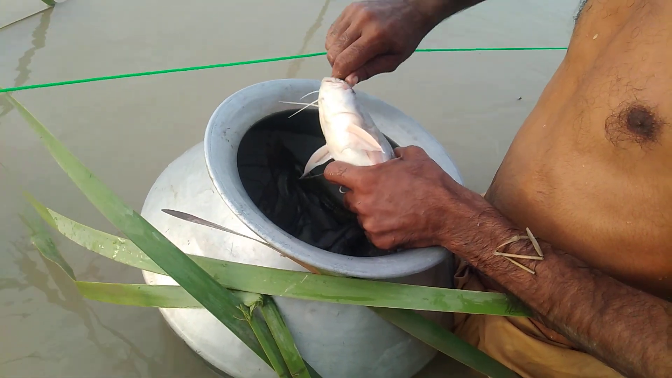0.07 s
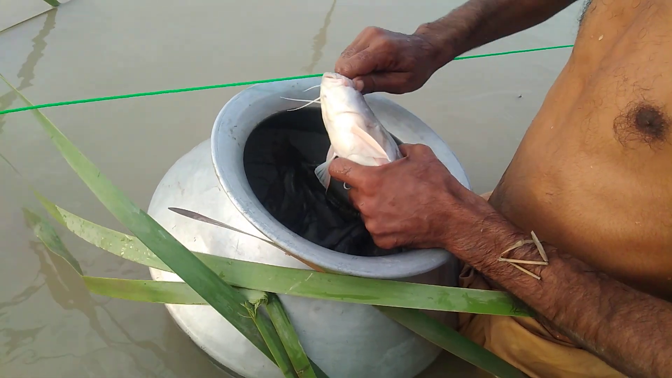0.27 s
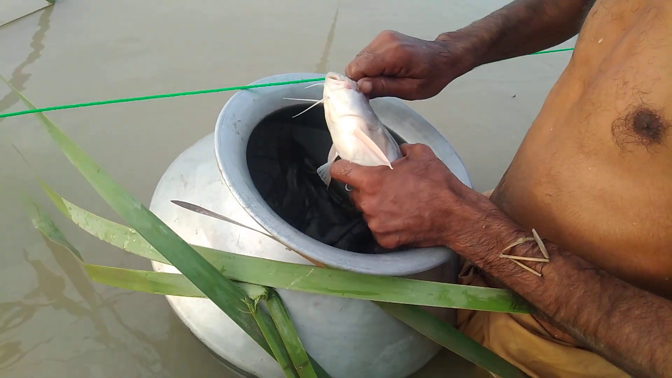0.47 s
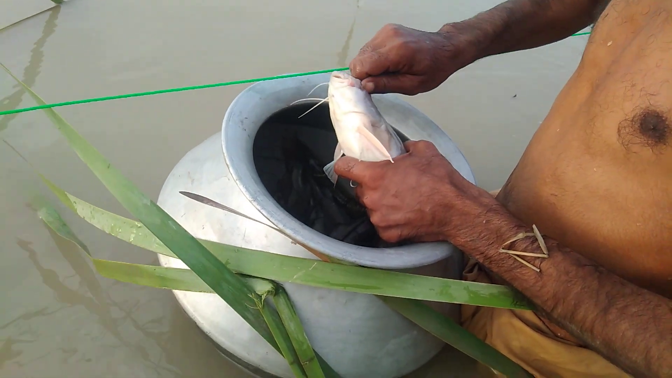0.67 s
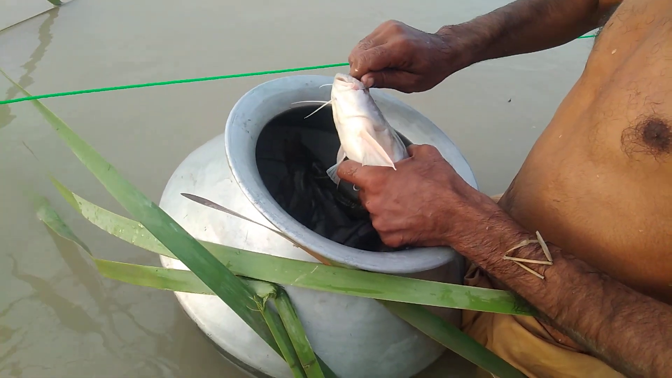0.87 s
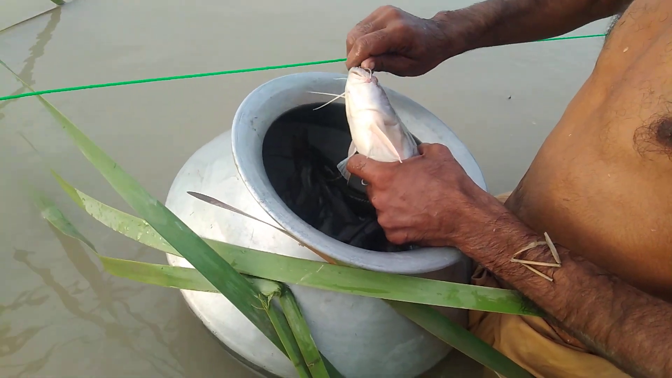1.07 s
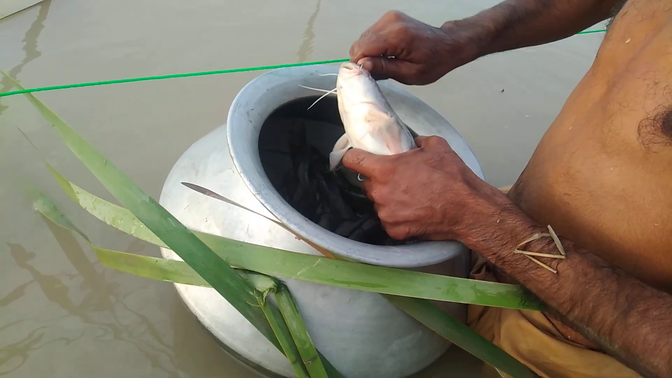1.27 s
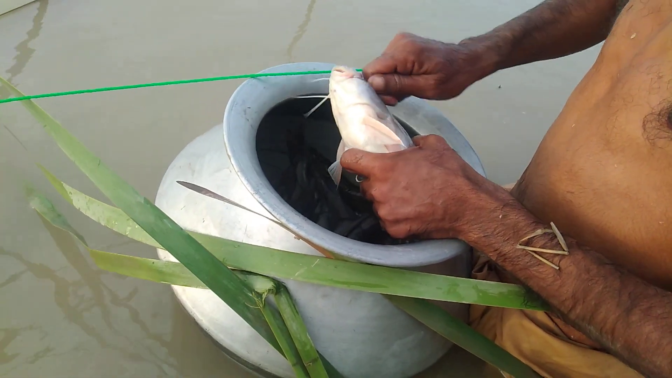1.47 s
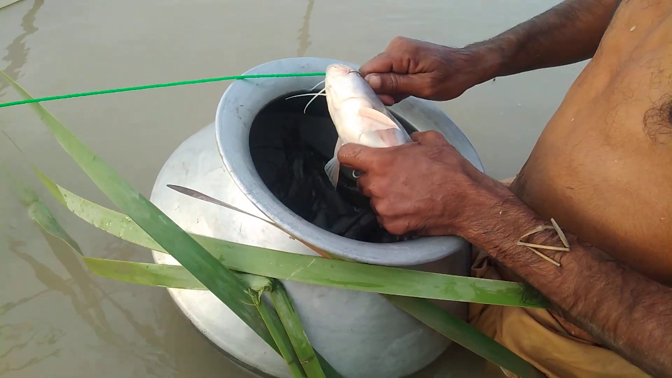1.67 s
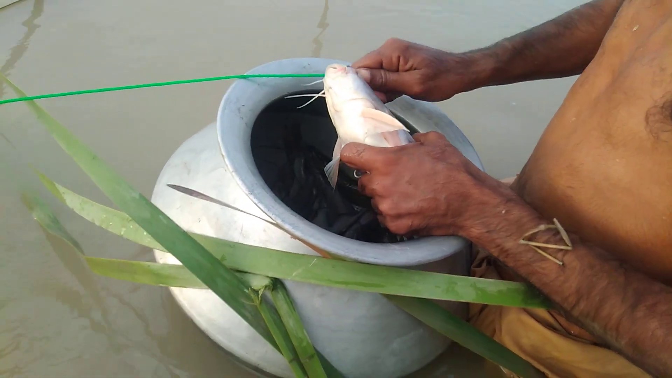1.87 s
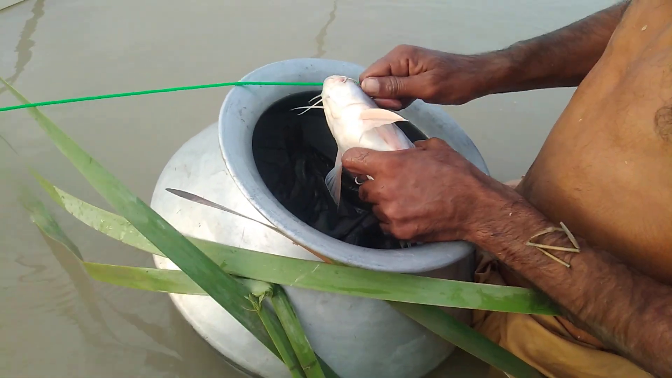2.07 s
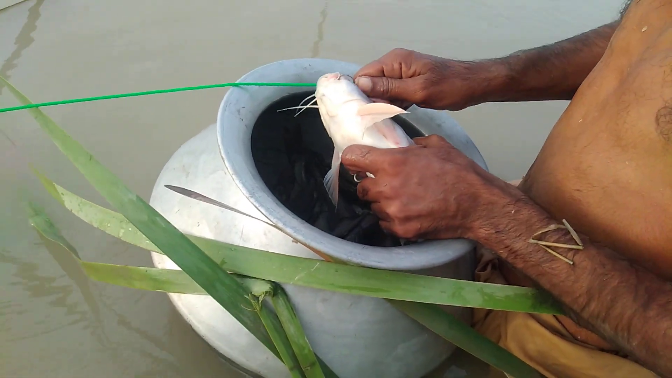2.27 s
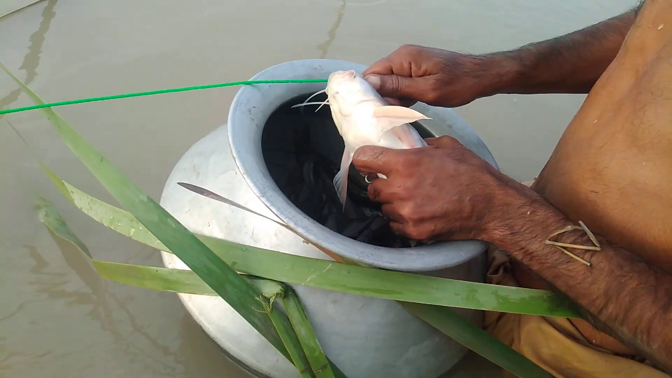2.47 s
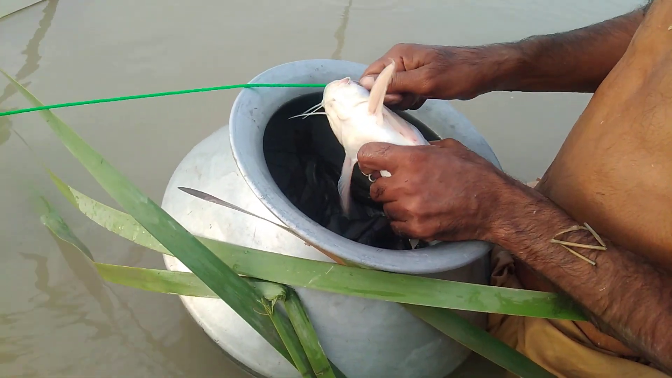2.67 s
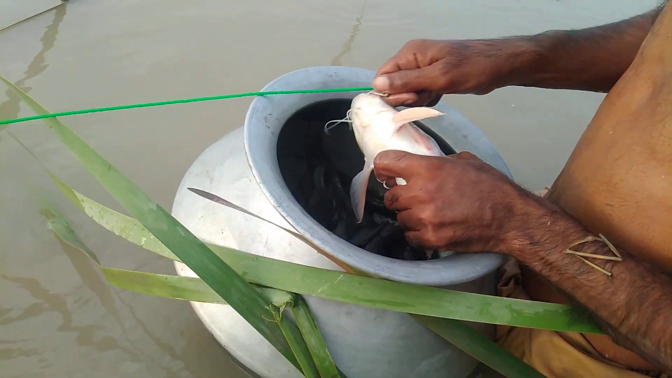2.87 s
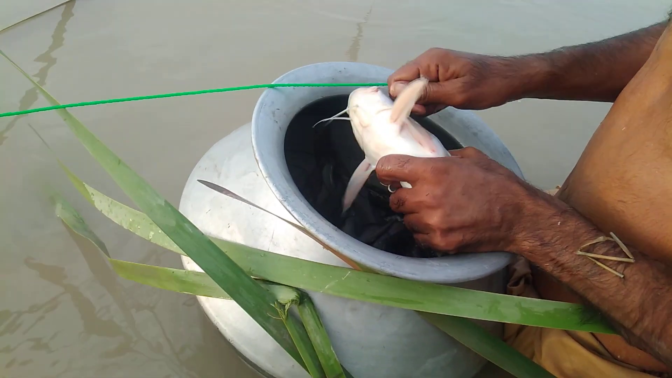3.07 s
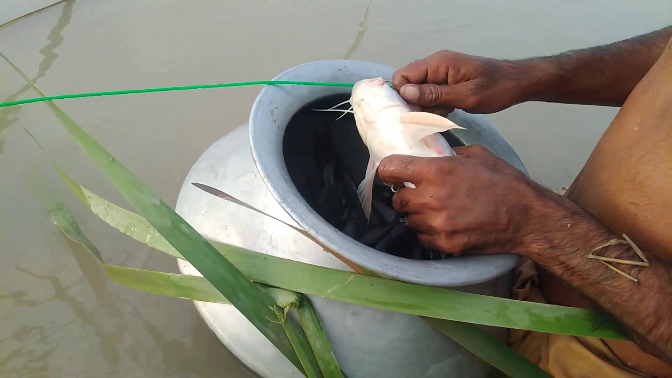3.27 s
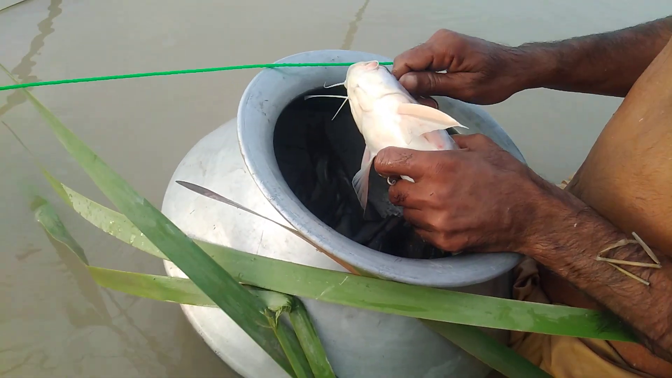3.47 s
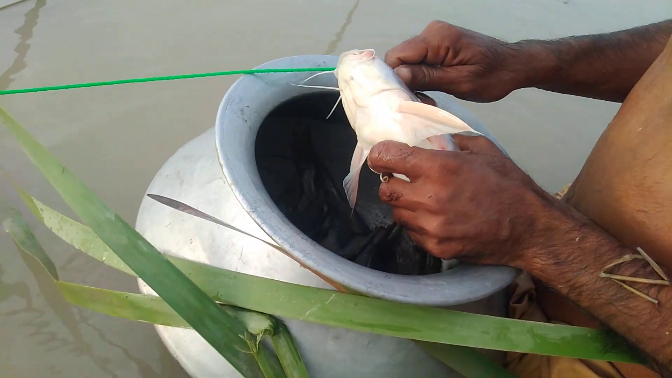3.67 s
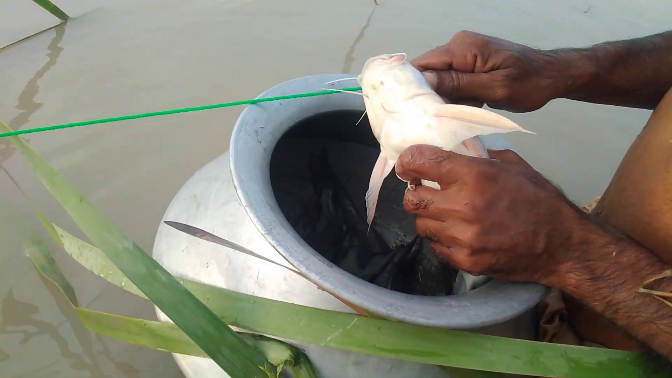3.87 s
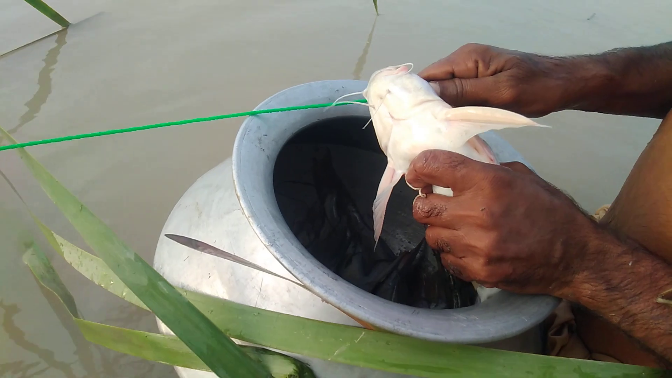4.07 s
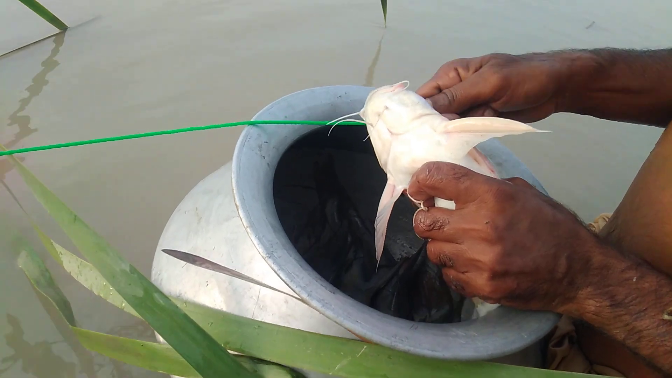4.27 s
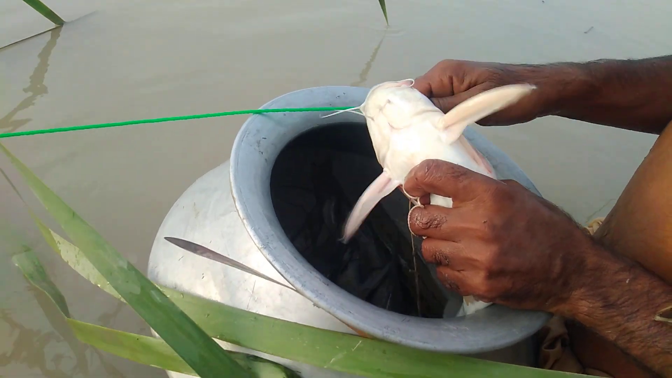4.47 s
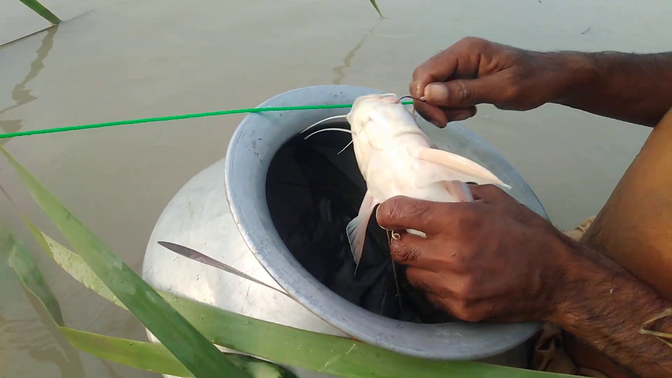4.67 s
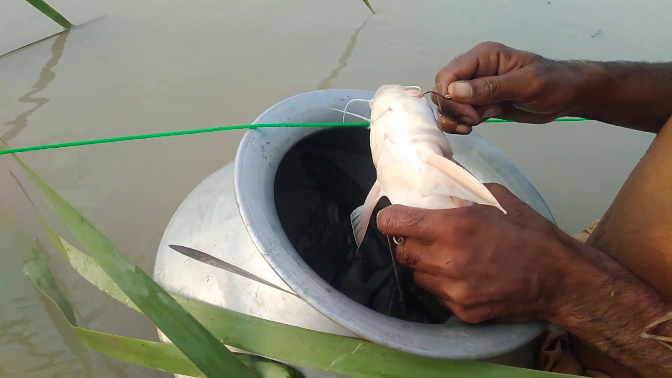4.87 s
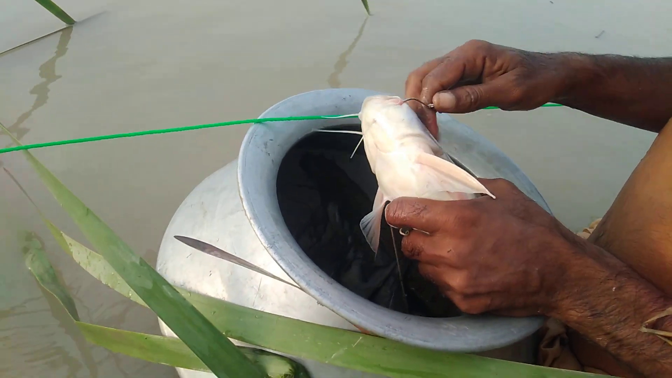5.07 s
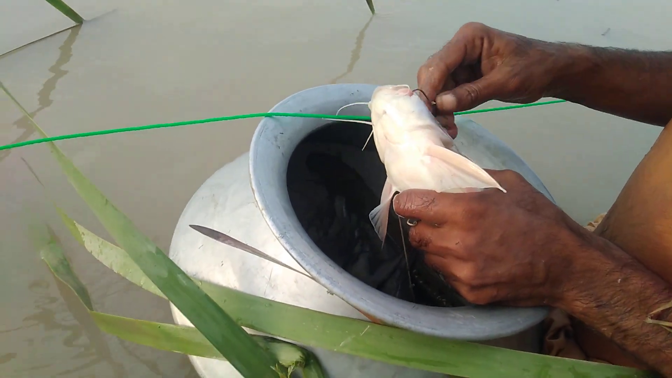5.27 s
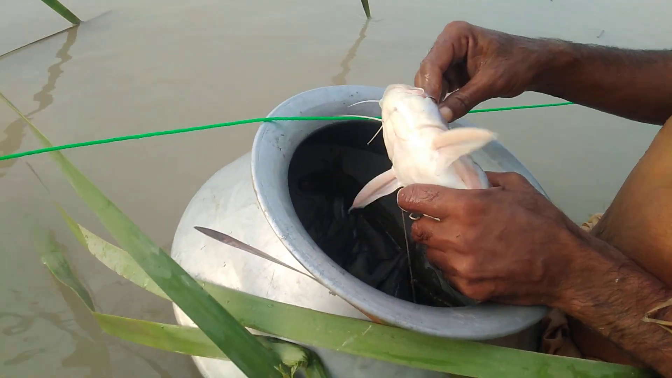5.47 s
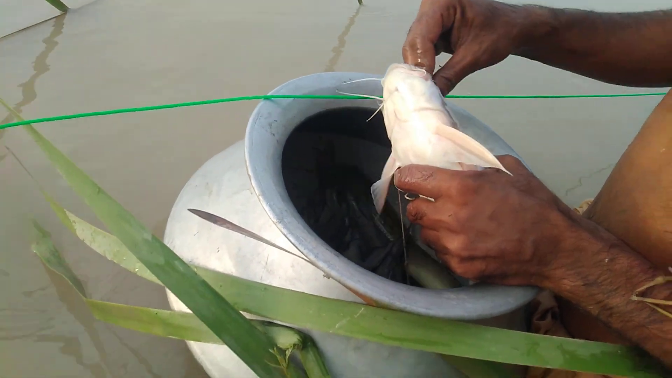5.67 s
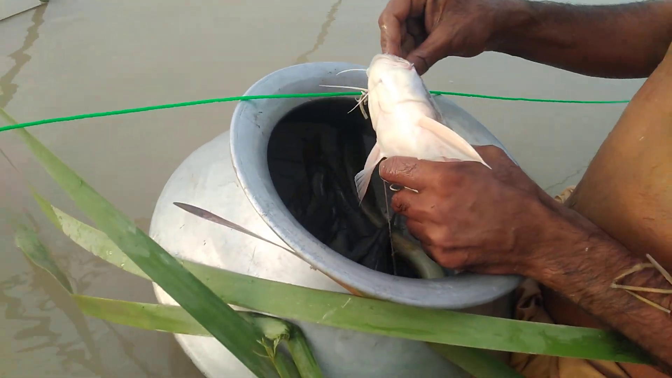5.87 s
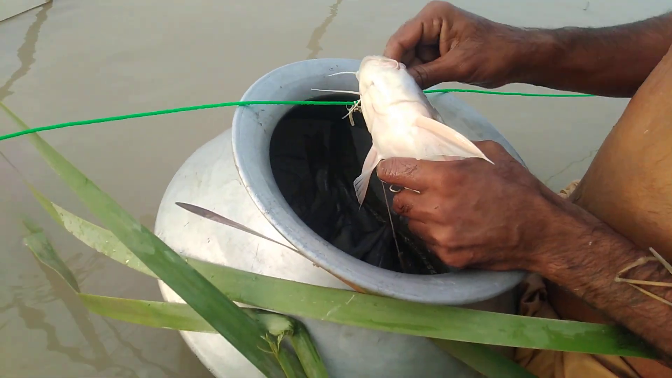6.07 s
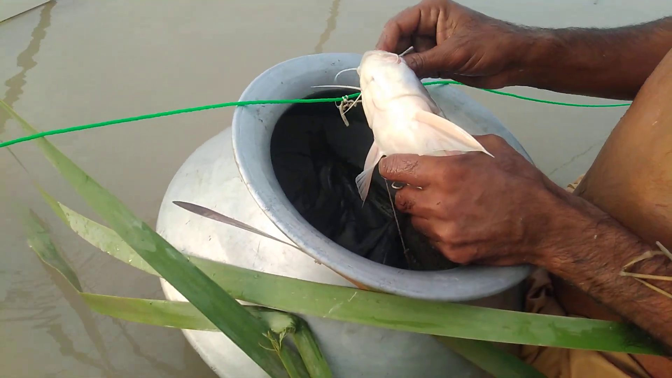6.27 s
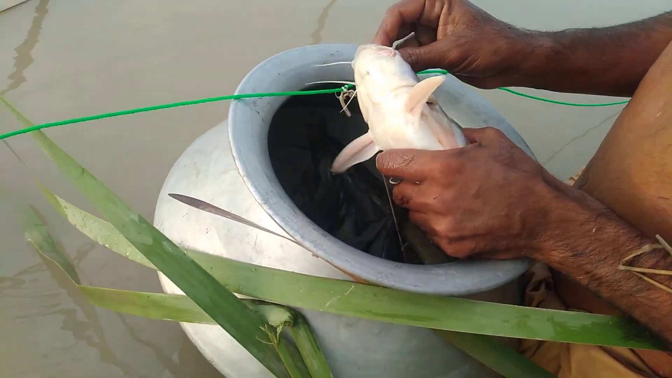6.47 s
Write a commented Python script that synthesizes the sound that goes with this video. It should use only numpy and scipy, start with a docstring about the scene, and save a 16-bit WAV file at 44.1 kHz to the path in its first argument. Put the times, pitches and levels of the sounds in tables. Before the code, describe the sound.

Light wind bumps the microphone over quiet shallow water. After a soft slippery rub and small ticks, a handled fish makes dry creaking croaks, grouped with pauses and ending in a single one. Sharp wet knocks sound the metal pot, tiny splashes stir its hollow interior, single drops plop, and a faint high insect trill comes and goes far away. Close, fairly dry outdoor sound.

```python
"""Shallow water, outdoors: a light breeze rumbles on the microphone while a catch stirs in an aluminium pot.
Close by, a wet hand slides over the fish and ticks on it; a far insect soon trills, and water drips.
Then the catfish, held over the pot, croaks by grinding its fin spines in their sockets: each stroke is a run
of ridge slips that speeds up and slows down, ringing the body and rasping in the treble.
Knocks ring the pot's metal between and after the first strokes."""
import sys
import numpy as np
from scipy import signal
from scipy.fft import rfft, irfft
from scipy.io import wavfile
from scipy.ndimage import uniform_filter1d

SR = 44100
rng = np.random.default_rng(int(sys.argv[2]) if len(sys.argv) > 2 else 0)


def unload_wav(signal):
    """Save mono or channel-first audio to the path in sys.argv[1] as 16-bit WAV at rate SR, clipped to [-1, 1]."""
    wavfile.write(
        sys.argv[1],
        SR,
        np.round(np.clip(np.atleast_2d(signal).T, -1, 1) * 32767).astype(np.int16),
    )


N = 286914
TIME = np.arange(N) / SR


def from_db(db):
    """Decibels to gain."""
    return 10 ** (np.asarray(db) / 20)


def rms_one(x):
    """Scale to unit power."""
    return x / np.sqrt(np.mean(x ** 2) + 1e-20)


def level_along(rows, t):
    """Level in dB at times t, joined by straight lines between the (time_s, level_db) rows."""
    time_s, level_db = np.transpose(rows)
    return np.interp(t, time_s, level_db)


def add(out, s, x):
    """Mix x in from second s."""
    at = max(0, round(s * SR))
    out[at:at + len(x)] += x[:max(0, N - at)]


def coloured(x, spectrum, size=2048):
    """Causal (minimum-phase) filter with the given spectrum and unit power gain."""
    hz, db = np.transpose(spectrum)
    grid = np.maximum(np.arange(size // 2 + 1) * SR / size, 1)
    grid_db = np.interp(np.log(grid), np.log(hz), db)
    cepstrum = irfft(np.log(from_db(grid_db)))
    # folding the cepstrum onto positive times makes the response minimum-phase
    cepstrum[1:size // 2] *= 2
    cepstrum[size // 2 + 1:] = 0
    response = irfft(np.exp(rfft(cepstrum)))
    return signal.fftconvolve(x, response / np.linalg.norm(response))[:len(x)]


def resonance(x, hz, width_hz):
    """Two-pole band-pass, gain 1 on top."""
    r = np.exp(-np.pi * width_hz / SR)
    poles = [1, -2 * r * np.cos(2 * np.pi * hz / SR), r * r]
    return signal.lfilter(np.array([1, 0, -1]) * (1 - r * r) / 2, poles, x + 1e-18)


def body(x, modes):
    """Parallel resonances of alternating sign."""
    return sum((-1) ** k * from_db(db) * resonance(x, hz, width) for k, (hz, width, db) in enumerate(modes))


def high_pass(x, hz):
    """Fourth-order low cut."""
    return signal.sosfilt(signal.butter(4, hz, "high", fs=SR, output="sos"), x)


def low_pass(x, hz):
    """Fourth-order high cut."""
    return signal.sosfilt(signal.butter(4, hz, fs=SR, output="sos"), x)


def dispersed(x, hz, width_hz):
    """All-pass: soft tissue delays one band and so smears each thump in time."""
    r = np.exp(-np.pi * width_hz / SR)
    poles = np.array([1, -2 * r * np.cos(2 * np.pi * hz / SR), r * r])
    return signal.lfilter(poles[::-1], poles, x)


def dying(t, t60):
    """Exponential decay, 60 dB down after t60 seconds."""
    return from_db(-60 * t / t60)


def evened(x, live, size=441):
    """Hold the short-term power at one for the live samples; what follows dies freely."""
    power = uniform_filter1d(x[:live] ** 2, size)
    return x / np.sqrt(np.pad(power, (0, len(x) - live), "edge") + 1e-12)


def wander(step_s):
    """A random value every step, joined by straight lines; the values spread about 1."""
    return np.interp(TIME / step_s, np.arange(4096), rng.standard_normal(4096))


# colour of the breeze's rumble on the microphone: pitch_hz, density_db [dB per Hz]
RUMBLE_COLOUR = [(8.8, -55), (15, 2), (43, 3), (113, -2.5), (183, -10.5), (261, -39), (400, -31),
                 (520, -56), (880, -120)]
# the breeze between gusts: time_s, level_db
BREEZE_LULL = [(0, -56), (1.7, -55.5), (2.3, -56), (2.9, -54), (3.9, -54), (4.6, -56), (5.4, -57.5),
               (5.8, -54.5), (6.5, -54.5)]
# gusts on the microphone: centre_s, half_length_s, level_db
WIND_GUSTS = [(.025, 0.039, -44.5), (0.348, 0.043, -47), (0.603, 0.022, -39.5), (0.681, .03, -37),
              (1.164, 0.052, -42.5), (1.657, 0.052, -49.5), (1.937, .06, -51.5), (2.814, 0.022, -50.5),
              (3.697, 0.078, -51.5), (4.132, 0.09, -47), (5.65, .04, -44), (6.363, .03, -45)]
# colour of the open air over the water: pitch_hz, density_db [dB per Hz]
OPEN_AIR_COLOUR = [(120, -16.5), (200, -2.5), (432, -16), (569, -11.5), (806, -18), (1100, -14),
                   (1560, -17.5), (1710, -18), (2910, -27.5), (5330, -33), (5940, -28.5), (7010, -31.5),
                   (15100, -28), (16000, -20.5)]


def outdoors(air_db=-63, wander_db=1, wander_s=.08):
    """Lumpy wind on the microphone, swelling in bell-shaped gusts, over a quiet steady hiss."""
    wind = evened(coloured(rng.standard_normal(N), RUMBLE_COLOUR, size=16384), N, size=4410)
    power = from_db(level_along(BREEZE_LULL, TIME) + wander_db * wander(wander_s)) ** 2
    for s, half_s, db in WIND_GUSTS:
        power = power + from_db(db) ** 2 * np.exp(-((TIME - s) / half_s) ** 2)
    air = rms_one(high_pass(coloured(rng.standard_normal(N), OPEN_AIR_COLOUR), 133))
    return wind * np.sqrt(power) + from_db(air_db) * air


# how restless the catch is between splashes: time_s, level_db
RESTLESSNESS = [(0, -76), (.4, -66.5), (.9, -79.5), (1.4, -67.5), (2.3, -79), (2.9, -68.5), (4.1, -69.5),
                (5.1, -69), (5.55, -56), (5.8, -65), (6.5, -67.5)]
# resonances of the air in the pot: pitch_hz, width_hz, level_db
POT_AIR = [(1213, 32.5, 5), (1678, 93, 2), (2286, 21, -5.5), (2720, 23, -7.5), (3360, 27, -8.5),
           (3690, 22, -8.5), (4380, 23, -13)]


def fidgeting(drops_per_s=400, size_db=4.5, clump_db=4.0, clump_s=0.024, spray_db=-17.5):
    """Tiny splashes come in random clumps and keep the hollow of the pot sounding."""
    falls = rng.random(N) < drops_per_s / SR
    sizes = from_db(size_db * np.minimum(rng.exponential(1, N), 3))
    drops = falls * sizes * rng.choice([-1, 1], N)
    drops = drops * from_db(clump_db * wander(clump_s))
    spray = high_pass(resonance(drops, 1000, 2300), 790)
    splashes = body(drops, POT_AIR) + from_db(spray_db) * spray
    return from_db(level_along(RESTLESSNESS, TIME)) * rms_one(splashes)


# a wet hand slides on the skin: time_s, level_db
HAND_SLIDE = [(0.04, -63.5), (0.076, -46), (0.088, -48.5), (0.134, -47), (0.22, -64.5), (0.26, -84)]
# colour of the slide: pitch_hz, density_db [dB per Hz]
SKIN_COLOUR = [(180, -42), (300, -15), (354, -24), (447, 0), (870, -11.5), (930, -5.5), (1530, -1.5),
               (3030, -24.5), (10600, -20), (12100, -26), (16000, -7.5)]
# sharp wet ticks of fingers, fins and line, and the bright contact of some knocks on the pot: start_s,
# level_db, slap_db [re tick]
WET_TICKS = [(.382, -35, 10.5), (0.535, -55, 7), (1.437, -45, 7), (1.487, -43.5, 12), (2.554, -41.5, 3),
             (2.816, -39.5, -11), (4.224, -39.5, -19), (4.365, -35, 8), (5.698, -44, 0)]
# colour of a ridge's click, shared by the ticks and the croaks: pitch_hz, density_db [dB per Hz]
CLICK_COLOUR = [(1500, -24), (3000, -12), (4300, -17.5), (5600, -9.5), (6500, -8), (7300, -4), (8800, -9),
                (10300, -5), (11900, -1.5), (13200, -4), (14500, 1), (15450, 7), (16500, -4)]


def handling(tick_t60=0.022, slap_cut_hz=600, flutter_db=3.0, flutter_s=.005):
    """Wet fingers slide in small jerks and tick on the fish and the line; some ticks are the bright contact of
    knocks on the pot."""
    friction = rng.standard_normal(N) * from_db(flutter_db * wander(flutter_s))
    out = rms_one(coloured(friction, SKIN_COLOUR)) * from_db(level_along(HAND_SLIDE, TIME))
    out *= (TIME > HAND_SLIDE[0][0]) & (TIME < HAND_SLIDE[-1][0])
    t = np.arange(SR // 10) / SR
    for s, db, slap_db in WET_TICKS:
        snap = rng.standard_normal(len(t)) * dying(t, tick_t60)
        slap = high_pass(resonance(snap, 670, 700), slap_cut_hz)
        add(out, s, from_db(db) * (coloured(snap, CLICK_COLOUR) + from_db(slap_db) * slap))
    return out


# far insect trills: start_s, end_s, level_db
INSECT_TRILLS = [(0.157, .7, -74), (0.77, 0.978, -77.5), (1.196, 1.728, -73.5), (2.02, 2.522, -73.5),
                 (2.783, 3.254, -69.5), (3.554, 3.998, -72), (5.028, 5.354, -73), (5.689, 6.164, -70.5)]


def insect(first_hz=5800, last_hz=6130, waver_hz=90, pulses_per_s=28):
    """A narrow pulsing trill that climbs a little and swells."""
    out = np.zeros(N)
    for start, end, db in INSECT_TRILLS:
        t = np.arange(int((end - start) * SR)) / SR
        effort = np.sin(np.pi / 2 * t / t[-1])
        waver = rms_one(uniform_filter1d(rng.standard_normal(SR), size=80))[:len(t)]
        pitch_hz = first_hz + (last_hz - first_hz) * effort + waver_hz * waver
        tone = np.sin(2 * np.pi * np.cumsum(pitch_hz) / SR)
        pulses = np.abs(np.sin(np.pi * pulses_per_s * t))
        add(out, start, from_db(db) * np.sqrt(effort) * tone * pulses)
    return out


# the catch splashes in the pot: time_s, level_db
SPLASHES = [(.313, -71), (0.4338, -67.5), (1.512, -64.5), (1.965, -68), (1.9905, -67.5), (2.3592, -72.5),
            (2.745, -62), (3.3842, -68), (3.4367, -65), (3.7874, -72.5), (4.4045, -60.5), (4.766, -68),
            (4.911, -65.5), (5.0033, -67), (5.0382, -62), (5.0942, -63), (5.1224, -69), (5.2766, -60.5),
            (5.3938, -62), (5.7136, -60), (5.929, -69.5), (5.9707, -66.5)]


def stirs(t60=0.11, rise_s=.003, spray_db=-18.5):
    """Small splashes: clumps of droplets that sound the hollow of the pot."""
    out, t = np.zeros(N), np.arange(SR // 4) / SR
    for s, db in SPLASHES:
        # cubing the noise leaves sparse, spiky droplets
        drops = rng.standard_normal(len(t)) ** 3 * dying(t, t60) * (1 - np.exp(-t / rise_s))
        spray = high_pass(resonance(drops, 670, 2970), 650)
        splash = body(drops, POT_AIR) + from_db(spray_db) * spray
        add(out, s - rise_s, from_db(db) * rms_one(splash))
    return out


# drips: start_s, level_db, pitch_hz [of the bubble, at first], t60_s
WATER_DRIPS = [(0.864, -44, 1620, 0.021), (.866, -40.5, 1370, 0.018), (1.54, -32, 1246, 0.11),
               (3.483, -45, 376, 0.02), (4.175, -34, 444, 0.017), (4.178, -43.5, 990, 0.013)]


def drips(rise_s=0.0012, glide=0.0045):
    """Each drop traps a bubble whose pitch rises a little."""
    out, t = np.zeros(N), np.arange(SR // 5) / SR
    for s, db, hz, t60 in WATER_DRIPS:
        # after t60 the pitch is up by twice the glide, as a share
        phase = 2 * np.pi * hz * t * (1 + glide * t / t60)
        add(out, s, from_db(db) * np.sin(phase) * dying(t, t60) * (1 - np.exp(-t / rise_s)))
    return out


def slips(rise, length, top_rate, uneven, count, first_speed=.6, last_speed=0.46, plateau=1.4, size_db=2.0):
    """One click per ridge: the spine is fastest and steadiest in mid-swing, and catches near the ends."""
    clicks, s, drag = np.zeros(count), 0, 0
    for late, strong, grip in rng.standard_normal((64, 3)):
        if s >= length:
            break
        # swing: 0 where the spine is fastest, 1 at either end
        swing = (rise - s) / rise if s < rise else (s - rise) / (length - rise)
        slowest = first_speed if s < rise else last_speed
        speed = 1 - (1 - slowest) * np.sin(np.pi / 2 * swing ** plateau) ** 2
        jitter = uneven + .08 * swing ** 3
        # friction lingers over a few ridges and bends the pitch
        drag = .7 * drag + .35 * uneven * grip
        # the last 10 ms fade out
        ease = min(1, (length - s) / .01)
        clicks[int(s * SR)] = ease * from_db(strong * size_db * (-0.28 + 10 * jitter))
        s += np.exp(.8 * late * jitter + drag) / (top_rate * speed)
    return clicks


def arch(progress, shape, lean_db):
    """Level in dB along a stroke: a parabola up to the peak and another down from it, leaning to one end."""
    peak, start_db, end_db = shape
    rising_sag = start_db * (1 - progress / peak) ** 2
    falling_sag = end_db * ((progress - peak) / (1 - peak)) ** 2
    return lean_db * (progress - .5) - np.where(progress < peak, rising_sag, falling_sag)


# resonance of the belly wall: pitch_hz, width_hz
BELLY_WALL = (412, 212)
# resonances of the skull: pitch_hz, width_hz, level_db
SKULL_MODES = [(1463, 430, -11.5), (1762, 220, -7), (2300, 100, -17), (2510, 53, -12), (2663, 340, -21),
               (3610, 65, -22), (4160, 260, -25)]


def body_voice(thumps, progress, bladder_hz, belly_db, skull_db, bladder_width_hz=200,
               skull_gain_db=3.5, skull_spread_db=1.5, low_cut_hz=180, flesh_hz=4200):
    """Thumps ring the swim bladder, belly wall and skull, and the flesh dulls and smears them."""
    # every ridge jolts the skull with a strength of its own;
    # the skull takes over from the bladder as the fin swings, by skull_gain_db from start to end
    spread_db = skull_spread_db * rng.standard_normal(len(thumps))
    jolts = thumps * from_db(skull_gain_db * (progress - .5) + spread_db)
    voice = resonance(thumps, bladder_hz, bladder_width_hz)
    voice -= from_db(belly_db) * resonance(thumps, *BELLY_WALL)
    voice -= from_db(skull_db) * body(jolts, SKULL_MODES)
    return dispersed(low_pass(high_pass(voice, low_cut_hz), flesh_hz), 1550, 550)


def spine_rasp(clicks, grit, t, spine_hz, spine_db, grit_db=-4.5, bone_db=-7.5, bone_t60=.006,
               spine_width_hz=550, snag_db=-1.0):
    """Some ridges snag harder; the spine's many high modes ring briefly, differently in every grip."""
    snags = clicks * from_db(snag_db * rng.standard_normal(len(t)))
    bone = signal.fftconvolve(snags, rng.standard_normal(len(t)) * dying(t, bone_t60))[:len(t)]
    scrape = snags + from_db(bone_db) * bone + from_db(grit_db) * grit
    return coloured(scrape, CLICK_COLOUR) + from_db(spine_db) * resonance(scrape, spine_hz, spine_width_hz)


# spine strokes of the fish close by: start_s, fastest_s, end_s, top_rate [slips per s], unevenness [0-1],
# body_db, rasp_db, lean_db [change of force from start to end], bladder_hz, belly_db [re bladder],
# skull_db [re bladder], spine_hz, spine_db [spine ring re rasp]
SPINE_STROKES = [(1.135, 1.17, 1.216, 386, 0.14, -37, -44, 0.5, 774, -5.5, -1.5, 7200, -1),
                 (1.251, 1.277, 1.326, 463, .012, -32.5, -38.5, 0, 893, -12, -5, 7160, -14),
                 (2.55, 2.585, 2.613, 430, 0.08, -40.5, -44, -1.5, 650, -3.5, 1.5, 7000, -1),
                 (2.675, 2.7, 2.750, 438, 0.07, -36.5, -38, -6, 774, -8.5, 1, 7600, -14),
                 (2.763, 2.791, 2.815, 307, 0.17, -42.5, -45.5, 5, 940, -8, 0, 7900, -3),
                 (2.946, 2.98, 3.031, 430, 0.13, -40, -42, -2.5, 810, -2, 9.5, 6760, -1),
                 (3.061, 3.089, 3.142, 455, 0.03, -38, -34, 0, 936, -6, 4, 7300, -12),
                 (4.339, 4.371, 4.406, 397, 0.03, -39.5, -41, -0.5, 676, -2.5, 5, 7170, 1),
                 (4.438, 4.475, 4.526, 434, 0.11, -36, -35.5, 0.5, 890, -2, 5, 7550, 1),
                 (4.554, 4.587, 4.632, 452, 0.02, -36.5, -37.5, 3.5, 875, -8.5, 4.5, 7600, -2),
                 (5.325, 5.359, 5.395, 401, 0.05, -35.5, -43, -1, 720, -4, 0.5, 7150, 1.5),
                 (5.433, 5.482, 5.527, 436, 0.07, -35, -38, 3.5, 820, -5.5, 0.5, 7400, -3),
                 (5.53, 5.569, 5.620, 435, 0.01, -39, -37.5, 1.5, 950, -3.5, 7.5, 7360, -3),
                 (6.403, 6.427, 6.500, 387, 0.08, -34.5, -42.5, -7, 920, -7.5, 1.5, 7140, -2)]
# how the force of a stroke arches: peak [share of the stroke], start_db and end_db [how much lower]
BODY_FORCE = (0.44, 7.7, 10)
RASP_FORCE = (0.53, 5.8, 10.6)
# edges of a hollow in the croak's treble: low_hz, high_hz
TREBLE_HOLLOW = (5065, 6370)


def croaks(grit_t60=.009, bite_s=0.0029):
    """Each slip thumps the swim bladder and skull and sheds a brief gritty click that rings the spine."""
    out = np.zeros(N)
    t = np.arange(SR // 7) / SR
    for (start, fastest, end, top_rate, uneven, body_db, rasp_db, lean_db,
         bladder_hz, belly_db, skull_db, spine_hz, spine_db) in SPINE_STROKES:
        length = end - start
        progress = np.minimum(t / length, 1)
        clicks = slips(fastest - start, length, top_rate, uneven, count=len(t))
        grit_level = signal.lfilter([1], [1, -dying(1 / SR, grit_t60)], clicks)
        grit = grit_level * rng.standard_normal(len(t))
        thumps = clicks + (.008 + uneven / 4) * grit
        voice = body_voice(thumps, progress, bladder_hz, belly_db, skull_db)
        rasp = spine_rasp(clicks, grit, t, spine_hz, spine_db)
        live = min(int((length - .005) * SR), len(t))
        stroke = from_db(body_db + arch(progress, BODY_FORCE, lean_db)) * evened(voice, live)
        stroke += from_db(rasp_db + arch(progress, RASP_FORCE, lean_db)) * evened(rasp, live)
        add(out, start, stroke * (1 - np.exp(-t / bite_s)))
    return signal.sosfilt(signal.butter(2, TREBLE_HOLLOW, "bandstop", fs=SR, output="sos"), out)


# knocks on the pot: start_s, level_db, colour_hz [centre of the contact's colour], contact_t60_s,
# ring_db [re slap]
POT_KNOCKS = [(1.418, -51, 1270, 0.031, -21), (1.437, -43.5, 990, 0.027, 0), (1.452, -59, 960, 0.062, -16),
              (1.489, -34.5, 1020, 0.035, -20), (1.930, -53, 1300, 0.032, -9),
              (2.816, -33.5, 1890, 0.054, 0), (4.221, -44, 1900, 0.069, -7.5),
              (5.695, -41.5, 1790, 0.093, -12.5), (6.019, -51, 1630, 0.079, -12)]
# modes of the pot's wall: pitch_hz, level_db, t60_s
POT_WALL = [(554, -22, .4), (996, -4, .14), (1104, -7, .2), (1217, -4, .35), (1378, -8, .3),
            (1745, -9, .17), (2283, -4.5, .18), (2378, -9, .15), (2455, -6, .12), (2510, -8, .15),
            (2730, -9, .1), (2860, -5, .08), (3214, -11, .14), (3418, -9, .1), (3690, -18, .1),
            (4300, -18, .09), (4750, -16, .08)]


def knocks(colour_width_hz=650, low_cut_share=.4, high_cut_share=2.2, mode_spread_db=1.0):
    """A short wet slap on the wall, then the metal rings."""
    out, t = np.zeros(N), np.arange(SR // 2) / SR
    for s, db, colour_hz, contact_t60, ring_db in POT_KNOCKS:
        slap = resonance(rng.standard_normal(len(t)), colour_hz, colour_width_hz)
        slap = low_pass(high_pass(slap, low_cut_share * colour_hz), high_cut_share * colour_hz)
        slap = evened(slap, len(t)) * dying(t, contact_t60)
        ring = np.zeros(len(t))
        for hz, mode_db, t60 in POT_WALL:
            # the modes nearest the contact's colour take most of the blow
            share = 1 / (1 + np.log2(hz / colour_hz) ** 2)
            gain = share * from_db(mode_db + rng.normal(0, mode_spread_db)) * rng.choice([-1, 1])
            ring += gain * dying(t, t60) * np.sin(2 * np.pi * hz * t)
        add(out, s, from_db(db) * (slap + from_db(ring_db) * ring))
    return out


# the air of the whole pot booms at its mouth: pitch_hz, width_hz, level_db
POT_BOOM = [(205, 9.1, 24), (540, 21, -39)]


def surroundings(x, scatter_t60=.07, scatter_db=-17, pot_db=-50.0):
    """Brief scatter from arms, water and reeds; the open pot hums along."""
    t = np.arange(SR // 4) / SR
    tail = rng.standard_normal(len(t)) * dying(t, scatter_t60) * (t > .001)
    scatter = signal.fftconvolve(x, tail / np.linalg.norm(tail))[:N]
    hum = from_db(pot_db) * body(x, POT_AIR) + body(x, POT_BOOM)
    return x + from_db(scatter_db) * scatter + hum


def scene():
    """Fish and pot close by, insect and breeze around."""
    near = surroundings(croaks() + handling()) + knocks() + stirs() + fidgeting() + drips()
    return (near + insect() + outdoors())[None]


def record(dry, cutoff_hz=15780):
    """The top is cut steeply."""
    return signal.sosfilt(signal.ellip(10, .2, 70, cutoff_hz, fs=SR, output="sos"), dry)


dry = scene()
out = record(dry)
unload_wav(out)
```